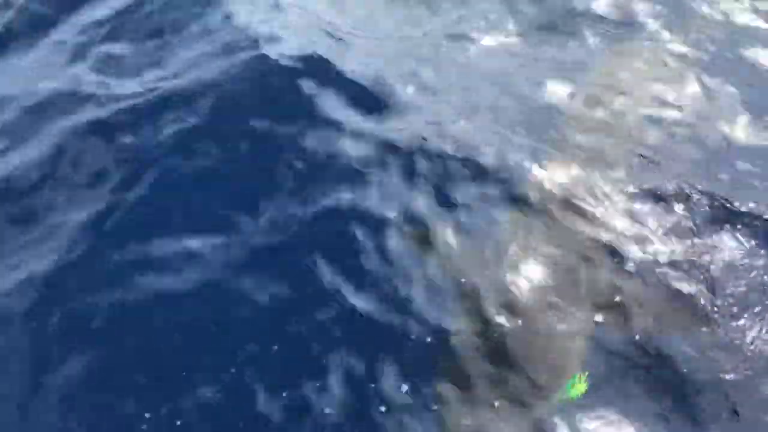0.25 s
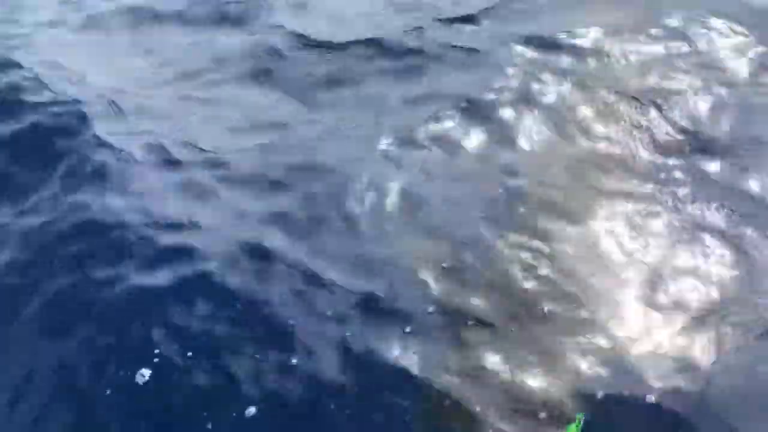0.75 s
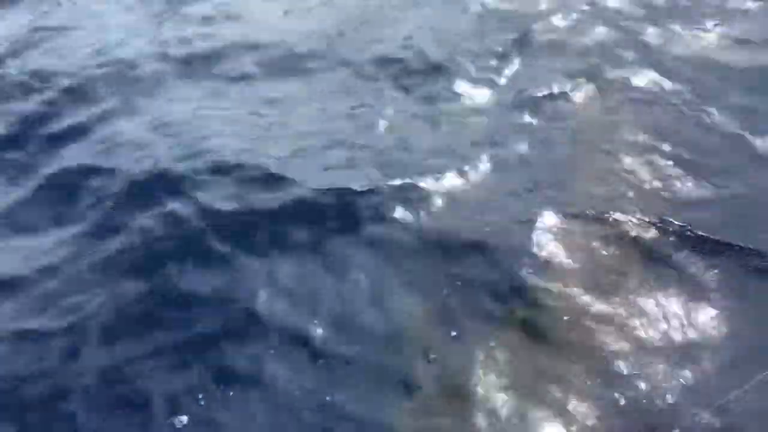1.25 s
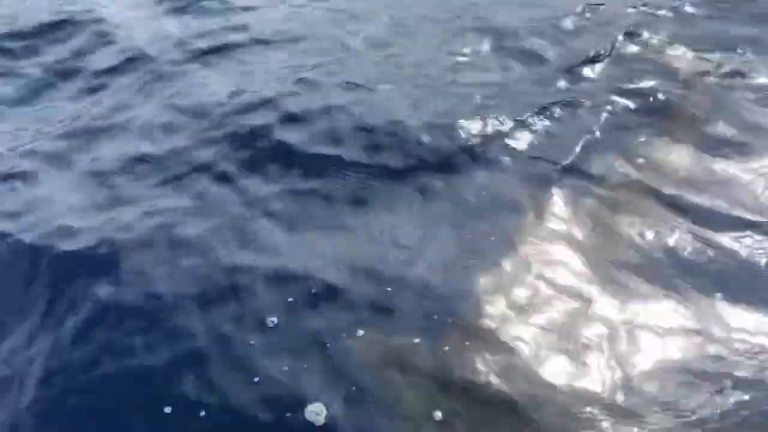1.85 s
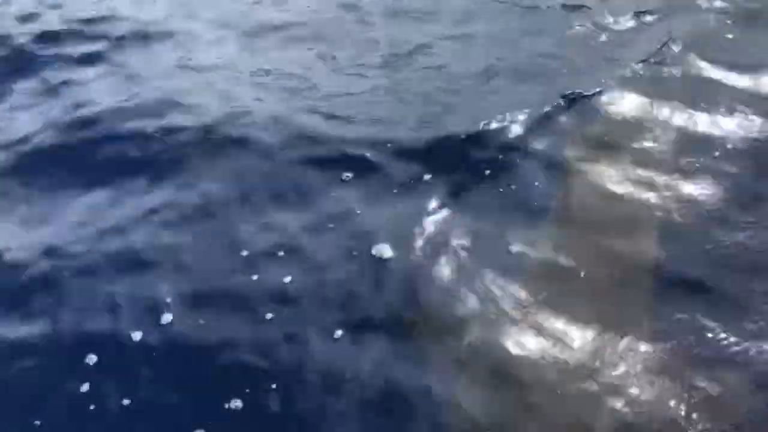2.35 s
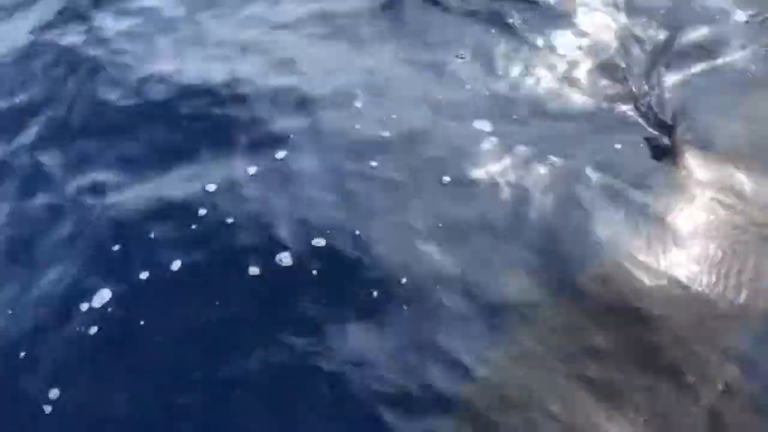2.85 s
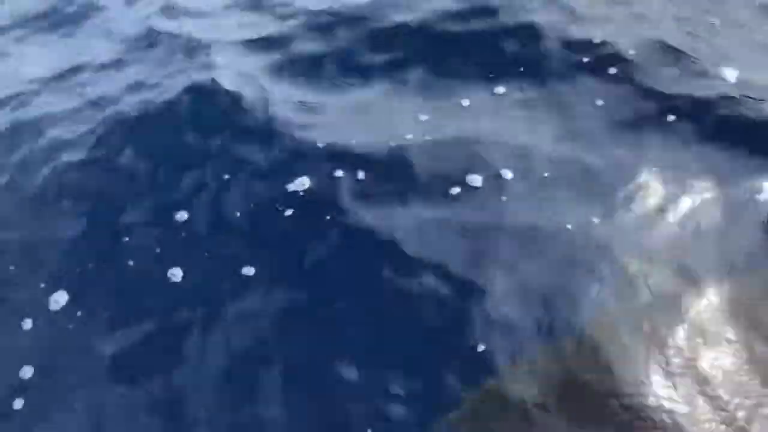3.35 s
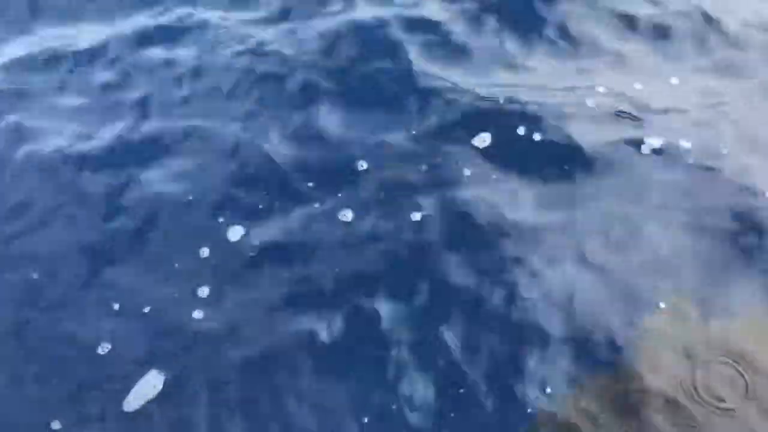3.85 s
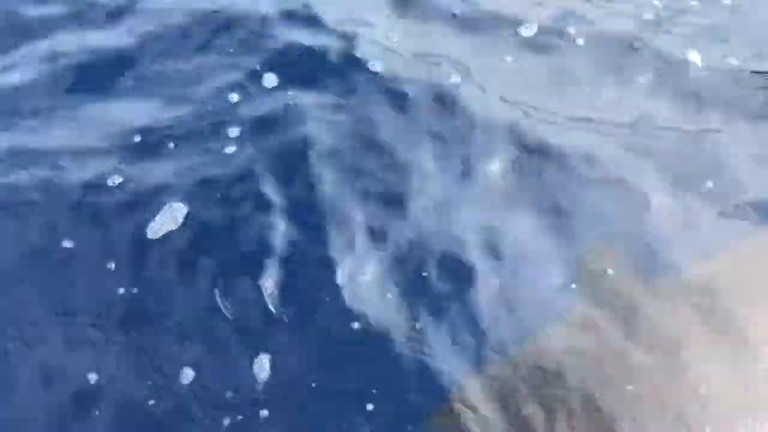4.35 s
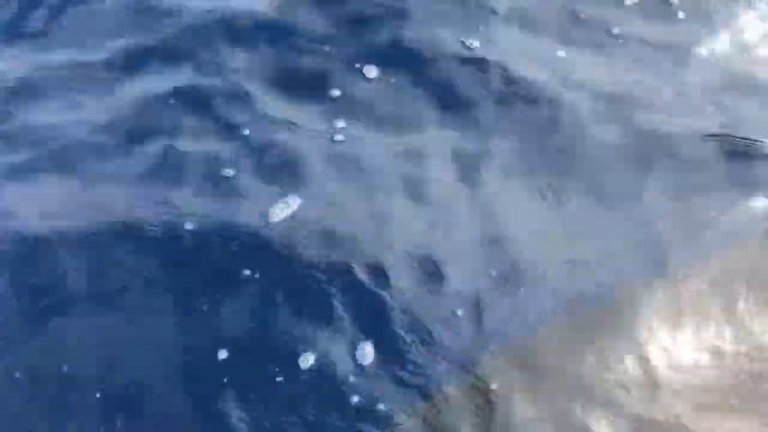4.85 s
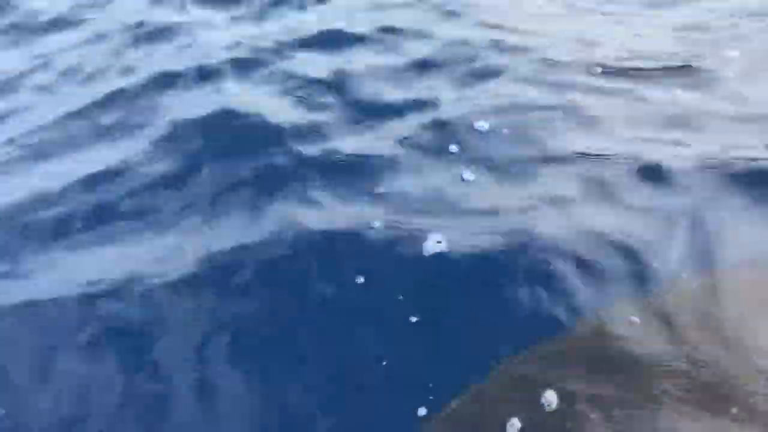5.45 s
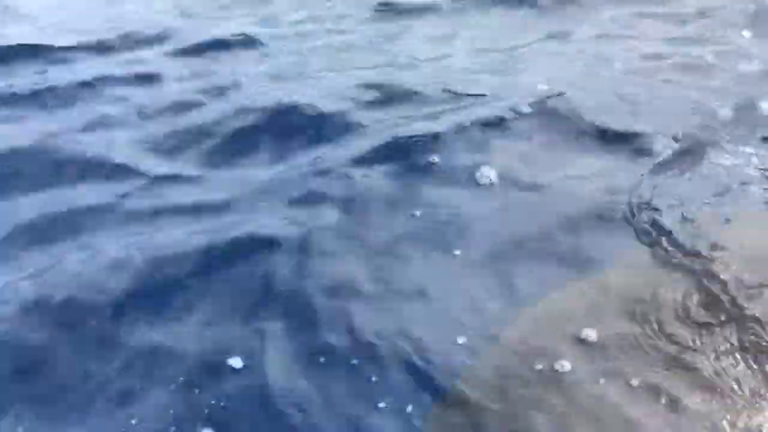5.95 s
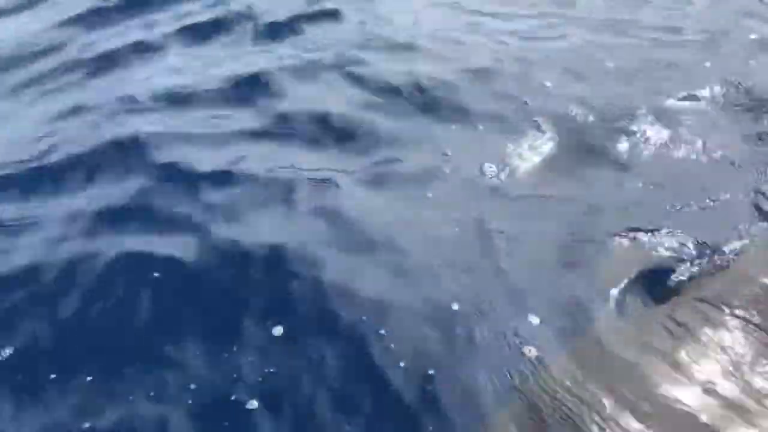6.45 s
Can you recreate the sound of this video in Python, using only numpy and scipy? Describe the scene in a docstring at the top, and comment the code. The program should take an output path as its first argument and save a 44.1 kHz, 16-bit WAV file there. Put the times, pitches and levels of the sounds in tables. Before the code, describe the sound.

Close above the rail of a small hollow boat, low surge, bubbly slosh and thin spray move unevenly over very faint open-sea hiss, while the hull hums low and wavering. The first second is fairly quiet, with small slaps and plops. From 1.3 to 1.9 s wet smacks cluster, strongest at 1.7, with faint metal clinks around 1.4 and 1.6; drips and fine trickles follow until about 2.6. Slaps resume near 3, and a taut line creaks briefly at 3.27, slowing as it slackens. At 3.73 one heavy knock booms through the hull, by far the loudest event, damped quickly by water. A gritty, fuzzy-toned scrape rises and falls from 4.06 to 4.37, ending beside a bright snap. Slaps and thumps cluster around 4.7. From 5.1 spray and dripping increase, with a trickle, a sharp drop at 5.6, hull thuds near 5.9 and plops to the end at 6.7.

```python
"""Swell laps a small hollow boat while a big fish rolls alongside; the hull hums under the wash.
Waves slap the side and thump the hull, whose panels ring; bubbles plop, drops tick and trickle.
Gear clinks, a taut line creaks, something heavy knocks the hull once and the line scrapes over the rail.
Water is shaped noise and bubble tones, hull and gear are ringing modes, the line is slips and fuzzy tones."""
import sys
import numpy as np
from scipy import signal
from scipy.fft import rfft, irfft, next_fast_len
from scipy.io import wavfile
from scipy.ndimage import uniform_filter1d, map_coordinates

SR = 44100
rng = np.random.default_rng(int(sys.argv[2]) if len(sys.argv) > 2 else 0)


def generate_wav(signal):
    """Clip the signal to [-1, 1] and save it as 16-bit WAV at the path in sys.argv[1]."""
    frames = np.transpose(np.atleast_2d(signal))
    scaled = np.clip(frames, -1, 1) * 32767
    pcm = np.round(scaled).astype(np.int16)
    wavfile.write(sys.argv[1], SR, pcm)


N = 295911  # length in samples

# How lively the water is over time: time_s, surge_db (along the hull), slosh_db, spray_db
WATER_LEVELS = [(0.0, -51, -57, -59), (0.45, -47.5, -55.5, -59.5), (1.28, -49.5, -58, -63.5),
                (1.55, -39, -51.5, -64), (1.76, -52.5, -52, -49.5), (2.09, -44.5, -48.5, -62.5),
                (2.37, -47, -54.5, -60.5), (3.03, -41, -52, -59.5), (3.19, -43, -46.5, -56),
                (4.03, -45.5, -54, -57), (4.42, -39, -46.5, -55.5), (4.9, -47, -52, -57),
                (5.13, -45.5, -46.5, -47.5), (5.35, -45.5, -47, -49), (6.1, -38.5, -47.5, -51),
                (6.36, -51, -47.5, -49), (6.59, -50.5, -48.5, -46.5), (6.71, -50.5, -53, -56)]
# Tone colour of each kind of water noise, before it is set to rms 1: frequency_hz, level_db (per Hz)
SURGE_SPECTRUM = [(13, -39), (22, -14.5), (54, 5.5), (102, 0), (146, 4), (370, -9), (422, -18.5),
                  (500, -28), (650, -12.5), (1100, -120)]
SLOSH_SPECTRUM = [(210, -29), (350, 8), (495, 6), (686, 6), (1210, 3.5), (1500, 4), (2040, -5),
                  (4000, -9.5), (5200, -75), (8800, -120)]
SPRAY_SPECTRUM = [(1470, -6.5), (2500, 2.5), (3600, -1.5), (4950, -2.5), (9580, -7), (14900, -7.5),
                  (16000, -5)]
# Far hiss of the open water, same columns: frequency_hz, level_db (per Hz)
SEA_SPECTRUM = [(200, 2), (400, -16), (1500, -46), (4000, -41), (9000, -15), (16000, -10)]
# Small random drops: level against the spray, and their middle pitch
SPATTER_DB, SPATTER_HZ = -6, 7300

# Water slapping the side: start_s, level_db (rough peak), centre_hz, treble_db, lasting_s
SLAPS = [(0.113, -35, 2720, -1.5, 0.011), (0.244, -30, 476, -21, 0.048), (0.323, -37.5, 930, -2, 0.019),
         (0.6, -34.5, 697, -8.5, 0.04), (1.344, -25.5, 1050, -13.5, 0.028), (1.402, -17.5, 770, -42, 0.036),
         (1.46, -23, 544, -22, 0.024), (1.526, -30.5, 1940, -31, 0.015), (1.557, -29.5, 1260, -29, 0.022),
         (1.595, -30, 1670, -17, 0.042), (1.629, -29, 636, -8.5, 0.032), (1.673, -22, 1250, -19, 0.02),
         (1.704, -11, 1170, -35, 0.032), (1.835, -31.5, 684, -9, 0.094), (1.931, -16.5, 1090, -26, 0.011),
         (2.209, -36, 2740, -26, 0.051), (2.568, -38, 2480, 4, 0.032), (2.744, -30.5, 1310, -3, 0.036),
         (3.0, -34, 1195, 0, 0.073), (3.091, -26, 630, -9.5, 0.0082), (3.2, -25.5, 517, -3.5, 0.021),
         (3.543, -29.5, 1910, 0.5, 0.049), (3.597, -22, 1150, -12, 0.043), (3.638, -26.5, 647, -2, 0.026),
         (3.701, -38, 3750, 11.5, 0.054), (3.731, -15.5, 588, -7.5, 0.031), (3.865, -38.5, 1430, 2, 0.015),
         (4.048, -37.5, 2440, 16, 0.0075), (4.077, -23.5, 2780, -1, 0.012), (4.37, -22, 1146, -13, 0.04),
         (4.468, -22, 510, -5, 0.02), (4.663, -29, 2100, 6.5, 0.0089), (4.69, -20, 1025, -40, 0.04),
         (4.71, -15, 706, -38, 0.012), (4.887, -35.5, 2100, -3, 0.033), (5.44, -39.5, 1580, 2, 0.1),
         (5.678, -32, 1355, 0, 0.071), (5.747, -32.5, 634, -33, 0.032), (5.861, -22.5, 760, -1, 0.026),
         (5.995, -26, 1190, -8, 0.019), (6.062, -27, 1450, -11, 0.015), (6.098, -25.5, 1263, -41, 0.067),
         (6.168, -25.5, 530, -2, 0.031), (6.287, -32, 1800, -2, 0.042), (6.404, -34.5, 1240, 9, 0.014)]
SLAP_CREST_DB = 13  # allowance for the peak over the body of a slap

# Ways the hull can ring: mode_hz, level_db, t60_s (time to fall 60 dB with no water on the skin)
HULL_MODES = [(95.5, 1, 0.52), (131, 1, 0.33), (157.3, 6, 0.38), (188.3, 1, 0.38), (229.4, 5.5, 0.28),
              (274, 10, 0.14), (336.2, 8, 0.16), (427.7, 1.5, 0.12), (540.4, 10.5, 0.17), (820, -4, 0.069),
              (1050, -37, 0.12)]
# Blows on the hull: start_s, peak_db, panel_hz (pitch of the struck panel)
THUMPS = [(0.243, -33, 186), (0.438, -32, 229), (0.621, -34.5, 220), (1.243, -33, 217), (1.351, -22, 86.6),
          (1.457, -24, 237), (1.672, -26, 255), (1.838, -32, 350), (2.044, -26.5, 169), (2.21, -30, 227),
          (2.259, -31, 164), (2.795, -27, 184), (3.081, -30, 175), (3.148, -28.5, 243), (3.209, -30, 210),
          (3.568, -27.5, 327), (3.614, -18.5, 355), (3.73, -3, 151), (3.734, -22.5, 580), (3.76, -9.5, 184),
          (4.128, -27.5, 352), (4.355, -28.5, 327), (4.489, -26, 178), (4.52, -30.5, 175),
          (4.632, -29, 232), (4.687, -24.5, 182), (4.707, -18.5, 236), (4.888, -29.5, 142),
          (5.525, -24.5, 172), (5.572, -22, 147), (5.597, -28.5, 155), (5.755, -30.5, 273),
          (5.865, -16, 145), (5.92, -20.5, 157), (5.984, -24.5, 260), (6.102, -24.5, 187)]
WET_RING = 0.91  # share of the free ringing time that water on the skin leaves

# Larger bubbles that sing a short note: start_s, level_db, pitch_hz, lasting_s,
# rise (half the share by which the pitch climbs; negative falls; no unit)
PLOPS = [(.248, -38, 485, 0.026, 0.078), (0.409, -34.5, 468, 0.034, 0.025), (.597, -38.5, 420, 0.029, .02),
         (.612, -38, 722, 0.049, -0.052), (1.9, -33.5, 1025, 0.055, 0.06), (1.952, -40, 1140, 0.038, 0.072),
         (2.935, -42, 500, 0.031, 0.12), (2.96, -42, 633, 0.024, 0.064), (3.25, -43, 897, 0.047, 0.13),
         (3.402, -37.5, 512, 0.019, 0.08), (4.304, -34, 1445, 0.01, .07), (4.491, -39, 916, 0.063, .05),
         (5.716, -36, 607, 0.016, 0.042), (6.1, -30, 1244, 0.03, 0.0054), (6.1, -33, 2250, 0.019, 0.035),
         (6.223, -41, 285, 0.078, 0.13), (6.327, -36, 610, 0.024, 0.24), (6.409, -37.5, 410, 0.026, -0.066),
         (6.526, -39, 593, .024, 0.52), (6.644, -43, 1000, .016, 0.044)]
PLOP_FLUTTER_DB, PLOP_WASH = 3, 0.2  # unsteadiness; churned water around the note

# Ringing modes of the metal fittings: mode_hz, level_db, t60_s (time to fall 60 dB)
GEAR_MODES = [(3660, -11.5, 0.17), (5900, -11, 0.14), (6500, -9, 0.1), (6950, -12, 0.1)]
# Touches of the fittings: start_s, level_db, loudest_hz (the mode nearest the touch)
CLINKS = [(1.349, -35, 5850), (1.406, -34, 3600), (1.412, -43, 6800), (1.43, -43, 5800), (1.599, -38, 3550),
          (1.6, -44, 6850)]

# Drops and snaps: start_s, level_db, pitch_hz (at the start)
TICKS = [(1.7034, -18, 1190), (1.8368, -34, 3480), (2.02, -44, 2400), (2.0604, -55, 2560),
         (2.0866, -51, 2600), (2.103, -45, 5270), (2.113, -52, 2640), (2.164, -39, 2830),
         (2.2099, -47, 3460), (2.2344, -41, 3970), (2.253, -44, 3600), (2.321, -44, 5550),
         (2.349, -42, 2780), (2.698, -33.5, 2170), (3.013, -31, 2620), (3.131, -32.5, 3400),
         (3.208, -31.5, 6450), (3.229, -32, 2160), (3.279, -32, 2860), (3.4607, -39, 2650),
         (3.526, -42, 2790), (3.5684, -25.5, 2250), (3.731, -20, 3600), (4.3659, -12.5, 7700),
         (4.492, -33, 2760), (4.645, -31.5, 1950), (4.685, -34, 3800), (4.741, -41, 5000),
         (4.917, -32, 5460), (4.932, -35, 6000), (4.986, -40, 3000), (5.056, -45, 12000),
         (5.087, -34, 2540), (5.1384, -40, 2660), (5.245, -26, 9300), (5.2554, -28.5, 2600),
         (5.311, -33, 6500), (5.345, -33, 2880), (5.3628, -25.5, 5860), (5.373, -29, 6540),
         (5.4167, -27, 4500), (5.48, -27.5, 2670), (5.597, -26, 3800), (5.6159, -16.5, 2260),
         (5.6356, -26.5, 3340), (5.679, -31, 3500), (5.8417, -31, 2280), (5.8718, -25.5, 1005),
         (6.037, -30, 2600), (6.172, -28.5, 3560), (6.4102, -25, 3340), (6.4227, -26.5, 3050),
         (6.4951, -26.5, 8900), (6.5205, -29.5, 3760), (6.54, -33, 7000), (6.572, -29.5, 4500),
         (6.6128, -36, 2800), (6.64, -33, 3060)]
TICK_CLICK = 0.33  # click against bubble

# Water trickling off the side in runs of like-sized drops: start_s, end_s, level_db, pitch_hz
TRICKLES = [(1.728, 1.92, -57, 6460), (1.834, 1.949, -46, 3960), (2.035, 2.368, -56, 2700),
            (2.082, 2.304, -60.5, 5400), (2.468, 2.644, -51.5, 2000), (4.964, 5.154, -49, 2540),
            (5.141, 5.275, -36, 2470), (5.156, 5.285, -42.5, 800), (5.436, 5.524, -38.5, 1690)]
TRICKLE_HISS = 0.4  # share of hiss, 0-1

CREAK_START_S, CREAK_LASTS_S, CREAK_DB, CREAK_HZ = 3.2655, 0.195, -26, 1420
SLIPS_PER_S, SLACK_LOSS_DB = 105, 13  # slips at full tension; loss when slack
SLACKENS = 3  # power by which the tension goes
CREAK_TAKES_UP = 0.22  # share of the creak over which the slips grow to full size

# Tones of the line rubbing over the ribs: multiple (of the rib rate, no unit), level_db
RAIL_LINES = [(2, -11), (3, -7.5), (3.4, -2), (4, 0.5), (5, -3), (6, -11), (8, -10), (9, -22), (11, -11)]
# Tone colour of the hiss of the wet line, before it is set to rms 1: frequency_hz, level_db (per Hz)
DRAG_SPECTRUM = [(120, -39), (200, 1), (299, -19), (340, 1), (482, -9), (2130, -12), (2750, -14),
                 (4200, -11.5), (4860, -17), (5330, -15.5), (16000, -24)]
SCRAPE_START_S, SCRAPE_END_S, SCRAPE_DB = 4.062, 4.37, -35.5
SCRAPE_ARCH = 0.55  # power that broadens the arch of the level
# Moment of top speed; ribs a second then; ribs a second lost by the square of the time from it
FASTEST_S, RIBS_PER_S, SAG_PER_S2 = 4.28, 1085, 3800

TOP_HZ = 15900  # nothing is kept from here up


def amp(db):
    """Gain of a level in dB."""
    return 10 ** (np.asarray(db) / 20)


def unit(x):
    """x scaled to rms 1 (an average strength of 1)."""
    return x / np.sqrt(np.mean(x ** 2) + 1e-20)


def curves(rows):
    """One value per sample for each column after the time."""
    time_s, *columns = np.transpose(rows)
    return [np.interp(np.arange(N) / SR, time_s, column) for column in columns]


def during(start, end):
    """Progress 0-1 from start to end, one value per sample."""
    return np.clip((np.arange(N) / SR - start) / (end - start), 0, 1)


def wobble(rate):
    """A smooth random curve through rate random points a second."""
    points = rng.standard_normal(int(N * rate / SR) + 4)
    return map_coordinates(points, [np.arange(N) * rate / SR])


def filtered(x, response):
    """x with each frequency changed by a response; spare room lets the filter ring out."""
    size = next_fast_len(len(x) + 8192)
    return irfft(rfft(x, size) * response(np.fft.rfftfreq(size, 1 / SR)), size)[:len(x)]


def peak(f, hz, width):
    """Response of a resonance, which favours frequencies near hz."""
    return 1j * f * width / (hz * hz - f * f + 1j * f * width)


def rush(spectrum, patchy_db):
    """Noise of rms 1 with a given tone colour and patches of random gain in time and pitch."""
    grid = signal.stft(rng.standard_normal(N), nperseg=512)[2]
    patches = uniform_filter1d(rng.standard_normal(grid.shape), size=6, axis=0)
    patches = uniform_filter1d(patches, size=8, axis=1)
    noise = signal.istft(grid * amp(patchy_db * unit(patches)), nperseg=512)[1][:N]
    f, db = np.transpose(spectrum)

    def colour(hz):
        return amp(np.interp(np.log(hz + 1), np.log(f), db, -120, -120))

    return unit(filtered(noise, colour))


def add(track, s, sound):
    """Lays a sound on the track at s seconds."""
    part = track[round(s * SR):][:len(sound)]
    part += sound[:len(part)]


def bubbles(count, hz, spread, cycles, size_db, size, length=N):
    """Random bursting bubbles: fading sines that rise in pitch, a few much larger than the rest; rms 1."""
    start, pitch = rng.random(count), rng.standard_normal(count)
    loud = np.minimum(rng.exponential(size=count), 4)
    pitch_hz = np.clip(hz * np.exp(spread * pitch), 150, 14000)
    turns = pitch_hz[:, None] * np.arange(size) / SR  # cycles so far, before the rise
    rise = 1 + 0.095 * np.minimum(turns / cycles, 1)
    fade_db = size_db * loud[:, None] - 30 * turns / cycles
    wave = np.sin(2 * np.pi * turns * rise) * amp(fade_db)
    at = (start * length).astype(int)[:, None] + np.arange(size)
    return unit(np.bincount(at.ravel(), wave.ravel(), length)[:length])


def narrow(hz, width_hz):
    """A fuzzy tone that follows hz: a sine whose strength wanders at random."""
    lumps = unit(filtered(rng.standard_normal(N), lambda f: 1 / (1 + (f / width_hz) ** 2)))
    return np.sqrt(2) * lumps * np.sin(2 * np.pi * np.cumsum(hz) / SR)


def water():
    """Patchy noise makes surge, slosh, spray and far sea; livelier slosh and spray hold more bubbles."""
    surge_db, slosh_db, spray_db = curves(WATER_LEVELS)
    lap = wobble(23)
    surge = amp(surge_db + 0.54 * wobble(4.3)) * rush(SURGE_SPECTRUM, patchy_db=2.2)
    lively = amp(np.clip(0.7 * (slosh_db + 47), -10, 1))
    gurgle = bubbles(count=1000, hz=1600, spread=0.5, cycles=22, size_db=3, size=1400)
    fizz = bubbles(count=3200, hz=5200, spread=0.6, cycles=18, size_db=3.3, size=300)
    slosh = 0.8 * rush(SLOSH_SPECTRUM, patchy_db=1.2) + 0.75 * lively * gurgle
    spray = 0.85 * rush(SPRAY_SPECTRUM, patchy_db=2.5) + 0.9 * lively * fizz
    slosh *= amp(slosh_db + 0.5 * lap + 2.3 * lively * wobble(30))
    spray *= amp(spray_db + lively * (lap + 0.97 * wobble(60)))
    drops = bubbles(count=1800, hz=SPATTER_HZ, spread=0.56, cycles=2.3, size_db=9.5, size=100)
    spatter = amp(spray_db + SPATTER_DB) * lively * drops
    far_sea = amp(-75) * rush(SEA_SPECTRUM, patchy_db=1.5)
    return surge + slosh + spray + spatter + far_sea


def hum():
    """A low hum wavers in the hollow hull, stronger as the surge grows."""
    surge_db = curves(WATER_LEVELS)[0]
    return amp(surge_db - 11.5 + wobble(3.1)) * narrow(np.full(N, 150.5), width_hz=4.1)


def slaps():
    """A burst of churned water: sudden, held a moment, then a short wet tail; a spitting treble rides on it."""
    out, t = np.zeros(N), np.arange(SR // 6) / SR
    for s, db, hz, treble_db, lasting in SLAPS:
        smack, hiss = rng.standard_normal((2, len(t)))
        lasting = np.clip(lasting, 0.003, 0.12)
        held_and_tail = np.exp(-(t / lasting) ** 3) + 0.18 * np.exp(-t / (0.5 * lasting))
        shape = (1 - np.exp(-t / 0.00014)) * held_and_tail

        def pocket(f):  # a trapped air pocket over a broad smack
            return peak(f, hz, 0.58 * hz) + 0.48 * peak(f, 1230, 730)

        smack = unit(filtered(smack, lambda f: pocket(f) * peak(f, 270, 1150)))
        # the spitting gain jumps every 80 samples
        spit = amp(3 * np.repeat(rng.standard_normal(len(t) // 80 + 1), 80)[:len(t)])
        # the pocket breaks into ringing bubbles
        foam = bubbles(count=50, hz=hz, spread=0.351, cycles=20.5, size_db=2.5, size=1200, length=len(t))
        hiss = hiss * spit * (1 - np.exp(-t / 0.0018))
        hiss = unit(filtered(hiss, lambda f: peak(f, 2500, 5000) * peak(f, 3300, 14000)))
        body = 0.86 * smack + 0.97 * foam + amp(treble_db) * hiss
        add(out, s, amp(db - SLAP_CREST_DB) * shape * body)
    return out


def hull():
    """Each blow rings mostly the modes near the struck panel's pitch; water on the skin shortens the ring."""
    out, t = np.zeros(N), np.arange(SR // 2) / SR
    hz, db, t60 = np.transpose(HULL_MODES)[:, :, None]
    # neighbouring modes start in opposition, so the boom swells and beats
    sides = (-1) ** np.arange(len(HULL_MODES))[:, None]
    for s, level_db, panel_hz in THUMPS:
        reach_db = np.maximum(-30 * np.log2(hz / panel_hz) ** 2, -22)
        ring = amp(db + reach_db - 60 * t / (t60 * WET_RING))
        modes = ring * np.sin(2 * np.pi * hz * (t + 0.00643))  # the push has begun before the crack
        attack = 1 - np.exp(-t / 0.0057)
        cling = 0.93 + np.exp(-(t / 0.032) ** 2)  # the wave clings and soon damps the panel
        sound = (sides * modes).sum(axis=0) * attack * cling
        add(out, s, amp(level_db) * sound / np.abs(sound).max())
    return out


def plops():
    """A bubble swells into its note amid churned water, slides in pitch, mostly upward, and dies away."""
    out = np.zeros(N)
    for s, db, hz, lasting, rise in PLOPS:
        t = np.arange(round(lasting * SR)) / SR
        wash = unit(filtered(rng.standard_normal(len(t)), lambda f: peak(f, hz, 0.5 * hz)))
        note = np.sin(2 * np.pi * hz * t * (1 + rise * t / lasting)) + PLOP_WASH * wash
        add(out, s, amp(db) * np.sin(np.pi * np.sqrt(t / lasting)) * note)
    return out * amp(PLOP_FLUTTER_DB * wobble(160))


def gear():
    """Metal fittings touch and ring thinly and unsteadily, mostly in the modes near the touched spot."""
    out, t = np.zeros(N), np.arange(SR // 3) / SR
    for s, db, near_hz in CLINKS:
        for hz, mode_db, t60 in GEAR_MODES:
            reach_db = -500 * np.log2(hz / near_hz) ** 2
            ring = amp(db + mode_db + reach_db - 60 * t / t60)
            add(out, s, ring * np.sin(2 * np.pi * hz * t * (1 - 0.08 * t)))  # the pitch sinks slightly
    return out * amp(4.5 * wobble(200))


def ticks():
    """A drop lands: a click of noise and a few cycles of its bubble, rising in pitch."""
    out, t = np.zeros(N), np.arange(SR // 30) / SR
    for s, db, hz in TICKS:
        burst = rng.standard_normal(len(t)) * amp(-60 * t / 0.023)
        click = filtered(burst, lambda f: peak(f, 1.76 * hz, 2.3 * hz))
        bubble = np.sin(2 * np.pi * hz * t * (1 + 15 * t)) * amp(-60 * t * hz / 35)
        add(out, s, amp(db) * (TICK_CLICK * click + bubble))
    return out


def trickles():
    """Each run swells and fades: separate drops of nearly one pitch over a thin hiss at that pitch."""
    out = np.zeros(N)
    for start, end, db, hz in TRICKLES:
        length = round((end - start) * SR)
        drops = bubbles(count=length // 600, hz=hz, spread=0.06, cycles=16, size_db=3.5,
                        size=500, length=length)
        hiss = unit(filtered(rng.standard_normal(length), lambda f: peak(f, hz, 0.12 * hz) ** 2))
        mix = (1 - TRICKLE_HISS) * drops + TRICKLE_HISS * hiss
        add(out, start, amp(db) * np.sqrt(np.hanning(length)) * mix)
    return out


def creak():
    """The taut line sticks and slips, slower and fainter as it slackens; each slip knocks with a bright edge."""
    gone = during(CREAK_START_S, CREAK_START_S + CREAK_LASTS_S)
    slack = gone ** SLACKENS
    rate = SLIPS_PER_S * (1 - slack) * (gone > 0) * (1 + 0.039 * wobble(60))
    slips = np.diff(np.floor(np.cumsum(rate) / SR), prepend=0)  # a pulse at each whole count
    slips *= amp(0.62 * rng.standard_normal(N) - SLACK_LOSS_DB * slack)
    slips *= np.sqrt(np.minimum(gone / CREAK_TAKES_UP, 1))
    knock = filtered(slips, lambda f: peak(f, CREAK_HZ, 470) ** 2)
    grit = rng.standard_normal(N) * filtered(slips, lambda f: 1 / (1 + 1j * f / 150))
    edge = filtered(grit, lambda f: peak(f, 4500, 12000) * peak(f, 4000, 9000))
    return (knock / knock.max() + 0.45 * edge / edge.max()) * amp(CREAK_DB)


def scrape():
    """The line speeds up over the ribs and slows: fuzzy tones at multiples of the rib rate in a gritty hiss."""
    from_fastest_s = np.arange(N) / SR - FASTEST_S
    rate = np.maximum(RIBS_PER_S - SAG_PER_S2 * from_fastest_s ** 2, 600)
    arch = np.abs(np.sin(np.pi * during(SCRAPE_START_S, SCRAPE_END_S))) ** SCRAPE_ARCH
    lines = unit(sum(amp(db) * narrow(k * rate, width_hz=32 * k) for k, db in RAIL_LINES))
    # the tones take the arch twice, so they swell and fade more steeply than the hiss
    rub = arch * lines + rush(DRAG_SPECTRUM, patchy_db=2.3)
    return rub * amp(SCRAPE_DB + 1.1 * wobble(60)) * arch


def scene():
    """Everything at one microphone above the rail."""
    wash = water() + hum() + slaps() + hull() + plops()
    return (wash + gear() + ticks() + trickles() + creak() + scrape())[None]


def record(dry):
    """The microphone port dips near 10 kHz and fades at the very top; nothing is kept above the band limit."""
    def port(hz):
        dip = 1 - 0.5 * peak(hz, 10440, 950)
        return dip / (1 + (hz / 14500) ** 6) * (hz < TOP_HZ)

    return filtered(dry[0], port)[None]


dry = scene()
out = record(dry)
generate_wav(out)
```